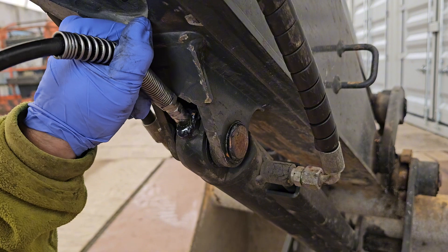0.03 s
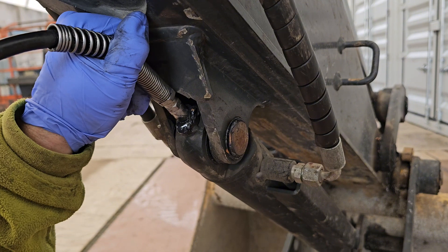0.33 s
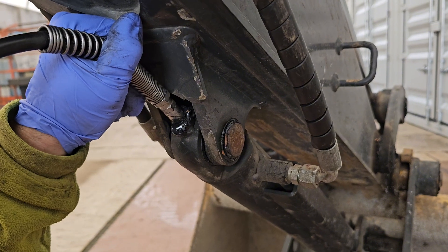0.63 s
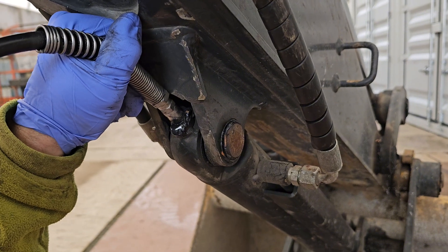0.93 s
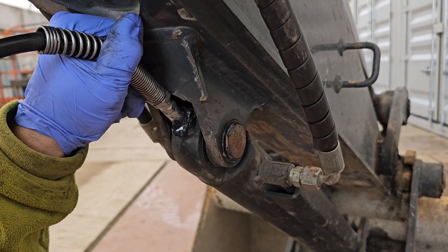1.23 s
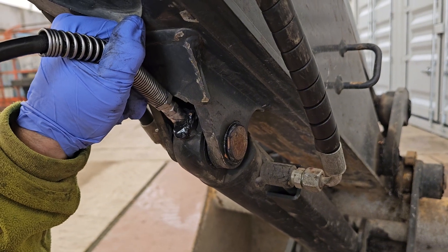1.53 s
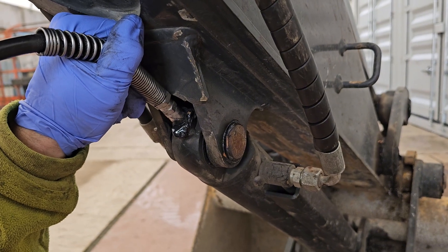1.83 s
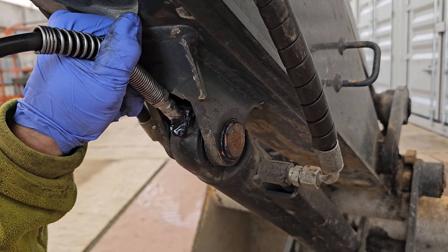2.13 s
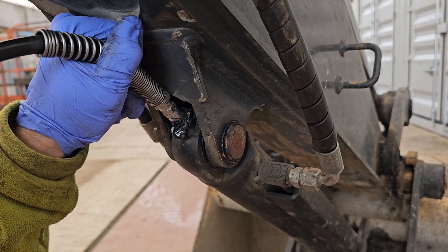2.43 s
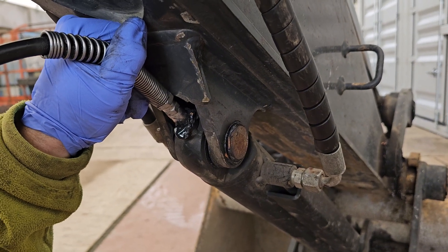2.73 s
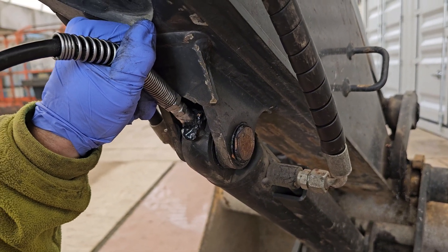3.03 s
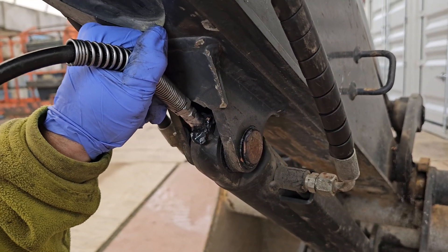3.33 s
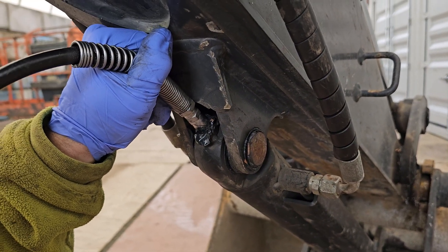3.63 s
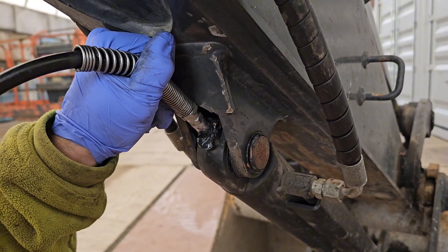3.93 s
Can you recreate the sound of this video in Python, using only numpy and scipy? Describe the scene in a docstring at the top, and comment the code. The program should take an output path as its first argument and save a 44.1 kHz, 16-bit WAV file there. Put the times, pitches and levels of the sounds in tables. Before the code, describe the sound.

A battery grease gun runs close by, outdoors over a faint distant engine hum. After a quiet opening, the trigger clicks at about 0.4 seconds and the motor whirs up. From 0.6 seconds it pumps evenly, six or seven strokes a second, each with a knock, a brief falling squeal and a bright metallic double snap. At about 3.9 seconds the motor stops quickly with a small click.

```python
"""Battery grease gun outdoors

The gun pumps into a fitting on a machine, close by, over a low hum. The trigger clicks and the geared
motor spins up. The plunger snaps free and rebounds in each stroke; from the second on, a clear knock
comes first and the push drags the motor down with a falling squeal. At last the motor brakes."""
import sys
import numpy as np
from scipy import signal
from scipy.fft import rfft, irfft
from scipy.io import wavfile
from scipy.ndimage import uniform_filter1d

SR = 44100
rng = np.random.default_rng(int(sys.argv[2]) if len(sys.argv) > 2 else 0)


def unload_wav(signal):
    """Save mono or channel-first audio to the path in sys.argv[1] as 16-bit WAV at rate SR, clipped to [-1, 1]."""
    wavfile.write(
        sys.argv[1],
        SR,
        np.round(np.clip(np.atleast_2d(signal).T, -1, 1) * 32767).astype(np.int16),
    )


N = 176400
TIME_S = np.arange(N) / SR
MOTOR_ON_S, MOTOR_OFF_S, FREE_SHAFT_HZ = .459, 3.868, 341.3


def amp(db):
    return 10 ** (np.asarray(db) / 20)


def unit_rms(x):
    return x / np.sqrt(np.mean(x ** 2) + 1e-20)


def lookup(table, hz, column=1):
    """One table column, interpolated over log frequency."""
    table = np.array(table, float)
    return np.interp(np.log(hz + 1), np.log(table[:, 0] + 1), table[:, column])


def add(mix, start_s, sound):
    part = mix[..., round(start_s * SR):][..., :sound.shape[-1]]
    part += sound[..., :part.shape[-1]]


def wander(hz):
    """Smooth random drift of unit RMS, rolling off above hz."""
    bins_hz = np.fft.rfftfreq(N, 1 / SR)
    return unit_rms(irfft(rfft(rng.standard_normal(N)) * np.exp(-(bins_hz / hz) ** 2), N))


def colour(x, spectrum):
    """Minimum-phase filter of unit energy."""
    size = 8192
    log_gain = np.log(amp(lookup(spectrum, abs(np.fft.fftfreq(size, 1 / SR)))))
    taps = np.fft.ifft(np.exp(np.conj(signal.hilbert(log_gain)))).real[:size // 2]
    return signal.oaconvolve(x, taps[None] / np.linalg.norm(taps), axes=1)[:, :N]


def whiten(burst, envelope):
    """Flattens a burst's spectrum; the envelope gates it and sets its RMS."""
    spectrum = rfft(burst)
    flat = irfft(spectrum / (abs(spectrum) + 1e-12), len(envelope))
    return unit_rms(flat * np.minimum(10 * envelope, 1)) * np.sqrt(np.mean(envelope ** 2))


def impacts(starts_s, levels_db, hold_s, fall_s, tail_db, tail_s, likeness, bounce_db, bounce_s):
    """Partly alike noise bursts: a contact, one quick bounce and a rattling tail."""
    t = np.arange(SR // 10) / SR
    contact = np.exp(-np.maximum(t - hold_s, 0) / fall_s)
    bounce = amp(bounce_db) * np.exp(-abs(t - bounce_s) / .0007)
    tail = amp(tail_db) * np.exp(-t / tail_s)
    envelope = np.minimum(t / .00028, 1) * np.sqrt(contact ** 2 + bounce ** 2 + tail ** 2)
    shared = rng.standard_normal((2, len(t)))
    out = np.zeros((2, N))
    for start_s, db in zip(starts_s, levels_db):
        grit = np.sqrt(likeness) * shared + np.sqrt(1 - likeness) * rng.standard_normal(shared.shape)
        add(out, start_s, amp(db) * whiten(envelope * np.tanh(grit), envelope))
    return out


def ring(starts_s, levels_db, modes, spread_db):
    """Decaying modes, struck a little differently each time."""
    t = np.arange(SR // 10) / SR
    hz, db, t60_s = np.transpose(modes)[:, :, None]
    waves = amp(db - 60 * t / t60_s) * np.exp(2j * np.pi * hz * t) * np.minimum(t / .00079, 1)
    out = np.zeros((2, N))
    for start_s, level_db in zip(starts_s, levels_db):
        gains = amp(level_db - spread_db * rng.standard_normal((2, len(modes))))
        phasors = np.exp(2j * np.pi * rng.random((2, len(modes))))
        add(out, start_s, ((gains * phasors) @ waves).real)
    return out


# Stereo balance. Each row: frequency in Hz, left minus right in dB.
BALANCE = [(200, 0.5), (500, 2.5), (1300, -1.5), (2500, -0.5), (4000, -1.5), (5000, 2), (6800, 3.5),
           (7900, 6.5), (8700, 10.5), (9600, 8), (10400, 3), (11400, -4.5), (12500, 5.5), (15000, -3)]
# Stereo likeness. Each row: frequency in Hz, coherence from 0 to 1, left lead in radians.
COHERENCE = [(100, 0.96, 0), (400, 0.91, 0.72), (1170, 0.9, -0.62), (1720, 0.4, 0.9), (2800, 0.34, 0.43),
             (3950, 0.51, 4.5), (5930, 0.074, -2.5), (8700, 0.27, 4.5)]


def stereo(pair):
    """Blends two signals into left and right, with balance, coherence and phase set by frequency."""
    hz = np.fft.rfftfreq(N, 1 / SR)
    left, other = rfft(pair)
    coherence = np.clip(lookup(COHERENCE, hz), 0, 1)
    lead_rad = lookup(COHERENCE, hz, column=2)
    right = coherence * left * np.exp(-1j * lead_rad) + np.sqrt(1 - coherence ** 2) * other
    lean = amp(lookup(BALANCE, hz) / 2)
    return irfft(np.array([left * lean, right / lean]), N)


# Outdoor air. Each row: frequency in Hz, relative level in dB.
AIR_SPECTRUM = [(20, -6.5), (40, -0.5), (60, 2.5), (105, -5.5), (140, -7), (200, -9), (300, -13),
                (500, -15), (800, -17.5), (1400, -18), (2100, -19), (3000, -22.5), (5000, -27),
                (8000, -34.5), (10000, -45), (11600, -29), (13000, -40), (15500, -43)]


def background(hum_hz=86.2, hum_db=-50, air_db=-44.5):
    """A distant engine's wavering hum, with rumbling air whose hiss settles before the motor starts."""
    phase = 2 * np.pi * np.cumsum(hum_hz + 2.57 * wander(hz=6.3)) / SR
    hum = amp(hum_db) * unit_rms(np.sin(phase) * (1 + .35 * wander(hz=7.3)))
    air_gain = amp(air_db + .77 * wander(hz=8.4))
    air = stereo(air_gain * colour(rng.standard_normal((2, N)), AIR_SPECTRUM))
    hiss = signal.sosfiltfilt(signal.butter(2, 400, "high", fs=SR, output="sos"), air)
    shelf_db = 2.8 - 7 * np.minimum(TIME_S / MOTOR_ON_S, 1)
    return hum + air + (amp(shelf_db) - 1) * hiss


# Softly ringing metal. Each row: frequency in Hz, level in dB, T60 in seconds.
FAINT_MODES = [(477, -48.5, .8), (1420, -57, 1.2), (2080, -54, 1.7), (2830, -56, 1.1)]


def faint_ring():
    """Metal already ringing at the start, dying away."""
    out = np.zeros((2, N))
    for hz, db, t60_s in FAINT_MODES:
        phase = 2 * np.pi * (hz * TIME_S + rng.random((2, 1)) / 4) + wander(hz=25)
        out += amp(db - 60 * TIME_S / t60_s) * np.sin(phase)
    return out


# Trigger and brake clicks. Each row: start in seconds, relative level in dB.
SWITCH_CLICKS = [(0.4324, -28), (.439, -40), (3.864, -33), (3.873, -34)]
# Colour of the clicks and the whirr. Each row: frequency in Hz, relative level in dB.
HOUSING_SPECTRUM = [(100, -19), (220, -14.5), (420, -22.5), (510, -10.5), (600, -16), (720, -7), (880, -13),
                    (1085, 0), (1190, -12.5), (1300, -0.5), (1450, -5.5), (1620, -1.5), (1820, -7),
                    (2100, -3), (2400, -3), (3000, -2), (3400, -3.5), (4600, -0.5), (5300, -7.5),
                    (6900, -8.5), (8000, -6), (8500, -14.5), (9700, -14), (10300, -21), (11600, -8.5),
                    (12400, -14.5), (14000, -14.5), (15500, -18.5)]


def switch():
    """Small plastic clicks as the gun starts and stops."""
    clicks = impacts(*np.transpose(SWITCH_CLICKS), hold_s=.0022, fall_s=.0039,
                     tail_db=-3.5, tail_s=.012, likeness=.15, bounce_db=-2, bounce_s=.004)
    return colour(clicks, HOUSING_SPECTRUM)


def windings(start_s=.447, length_s=.05, pulse_hz=1980, level_db=-44.5):
    """Pulsed drive current makes the windings sing until the shaft gets going."""
    envelope = np.sin(np.pi * np.clip((TIME_S - start_s) / length_s, 0, 1))
    phase = 2 * np.pi * pulse_hz * TIME_S
    return amp(level_db) * envelope * (np.sin(phase) + .5 * np.sin(2 * phase))


# Pump strokes. Each row: start in seconds and relative level in dB for knock, then snap, then rebound.
# The first stroke has no clear knock; its first two columns give only a faint tap.
PUMP_STROKES = [(0.5316, -10.5, 0.571, -10.5, 0.5809, -6.5), (0.6934, 0.5, 0.7293, -3, 0.7386, -3.5),
                (0.8426, 3.5, 0.8771, -0.5, 0.8875, -2.5), (0.9904, 3.5, 1.0252, -0.5, 1.0357, -3),
                (1.139, 2.5, 1.174, -2, 1.1872, -6), (1.2874, 2, 1.3239, -2.5, 1.3369, -6),
                (1.4392, 2, 1.4741, -2, 1.4878, -4.5), (1.5887, 1, 1.6254, -2, 1.6392, -4),
                (1.7404, 2, 1.7773, -3, 1.7918, -4.5), (1.893, 2, 1.9298, -2.5, 1.9435, -4.5),
                (2.0455, 1.5, 2.0826, -1, 2.0969, -4), (2.1984, 1.5, 2.2351, -0.5, 2.2495, -5.5),
                (2.3516, 1.5, 2.3886, -1.5, 2.4027, -4), (2.5051, 2, 2.542, -0.5, 2.5566, -5.5),
                (2.6588, -0.5, 2.6958, -1.5, 2.7109, -4), (2.8123, 0, 2.8504, -1.5, 2.8654, -4.5),
                (2.967, 1, 3.0049, -2, 3.0204, -5.5), (3.122, 1, 3.1601, -0.5, 3.1756, -5.5),
                (3.2778, 0, 3.3159, -2, 3.331, -5.5), (3.4335, 1, 3.4717, -4, 3.4872, -5.5),
                (3.5891, 1, 3.6277, -2.5, 3.6431, -6.5), (3.7455, 1, 3.7839, -1.5, 3.7997, -6.5)]


def motor(spin_up_s=.19, knee=6.5, wake_s=.038, brake_s=.026, sag_s=.011, recover_s=.03):
    """Soft start, drag from each push after the first, then braking. Running and load span 0 to 1."""
    drag, load = np.zeros((2, N))
    for knock_s, _, snap_s, *_ in PUMP_STROKES[1:]:
        push_s = snap_s - knock_s
        pushed_s = np.clip(TIME_S - knock_s, 0, push_s)
        freed_s = np.maximum(TIME_S - snap_s, 0)
        drag += (1 - np.exp(-pushed_s / sag_s)) * np.exp(-np.minimum(freed_s / recover_s, 20))
        load += np.sin(np.pi * (pushed_s / push_s) ** .72)
    elapsed_s = np.maximum(TIME_S - MOTOR_ON_S, 0)
    spin_up = elapsed_s / (elapsed_s ** knee + spin_up_s ** knee) ** (1 / knee)
    brake = np.exp(-np.maximum(TIME_S - MOTOR_OFF_S, 0) / brake_s)
    unloaded_hz = spin_up * brake * (FREE_SHAFT_HZ - 1.6 * TIME_S)
    sag = .18 + .009 * elapsed_s  # back pressure builds, so later pushes drag more
    shaft_hz = unloaded_hz * (1 - sag * drag) * (1 + .00399 * wander(hz=39.5))
    running = np.minimum(elapsed_s / wake_s, 1) ** 2 * brake
    return running, load, shaft_hz


def whirr(running, load, shaft_hz, ticks_per_s=900, base_db=-25, load_boost_db=3):
    """Gear teeth and brushes chatter once a turn and tick at random; a hiss lingers after the stop."""
    turns = np.cumsum(shaft_hz) / SR
    chatter = unit_rms(.88 + np.exp(-(turns % 1) / .39)) * rng.standard_normal((2, N))
    tick_gate = rng.random(N) < ticks_per_s / SR
    tick_db = 2.9 * np.minimum(rng.exponential(1, N), 4)
    ticks = tick_gate * amp(tick_db) * rng.standard_normal((2, N))
    level_db = base_db + load_boost_db * load + .75 * wander(hz=70) - .73 * (TIME_S - 2)
    gain = running * (shaft_hz / FREE_SHAFT_HZ) ** .74 * amp(level_db)
    stopped_s = np.maximum(TIME_S - MOTOR_OFF_S, 0)
    hiss = (stopped_s > 0) * amp(-35 - 35 * stopped_s) * rng.standard_normal((2, N))
    return colour(unit_rms(chatter + .34 * unit_rms(ticks)) * gain + hiss, HOUSING_SPECTRUM)


# Motor and gear tones at full speed. Each row: multiple of the shaft rate, free level in dB,
# loaded level in dB, left lead in radians.
SHAFT_ORDERS = [(1, -43.5, -50, 0.28), (3, -47.5, -57, .3), (4, -44, -61, 0.37), (5, -42, -56, 0.97),
                (12, -33.5, -46, 1.9)]
MESH_TEETH = 10


def whine(running, load, shaft_hz, start_gear_db=-32.5, start_gear_s=.115):
    """Rough shaft and gear tones that fade under load; one gear sings as the motor spins up."""
    turns = np.cumsum(shaft_hz) / SR
    tones = np.zeros((2, N))
    for order, free_db, loaded_db, lead_rad in SHAFT_ORDERS:
        jitter_rad = (.028 + .03 * load) * wander(hz=260) + .015 * wander(hz=60)
        phase = order * (2 * np.pi * turns + jitter_rad)
        gain = ((1 - load) * amp(free_db) + load * amp(loaded_db)) * (1 + .3 * wander(hz=140))
        tones += np.sqrt(2) * gain * np.array([np.sin(phase), np.sin(phase - lead_rad)])
    swell = np.sin(np.pi * np.clip((TIME_S - MOTOR_ON_S) / start_gear_s, 0, 1) ** 2) ** 2
    mesh_phase = 2 * np.pi * MESH_TEETH * turns + .3 * wander(hz=200)
    start_gear = amp(start_gear_db) * swell * np.sin(mesh_phase)
    return running * (tones * (shaft_hz / FREE_SHAFT_HZ) ** 2.2 + start_gear)


# Dull knock and bright snap. Each row: frequency in Hz, relative level in dB.
KNOCK_SPECTRUM = [(150, -23.5), (330, -5), (450, -3.5), (590, -9), (740, -3), (1000, 0), (1160, -8.5),
                  (1350, -1.5), (1600, 5), (1850, -5.5), (2100, 1), (2600, -4), (4000, -12), (7000, -24)]
SNAP_SPECTRUM = [(150, -36), (400, -28.5), (700, -17), (1000, -13), (1170, -20.5), (1320, -12.5),
                 (1800, -13), (2350, -5.5), (3000, -1.5), (3500, -8), (4250, 2.5), (4800, -7), (5700, -2),
                 (6600, -7.5), (7300, -4.5), (8000, -2.5), (8500, -12), (9400, -10), (10300, -19.5),
                 (11600, -6), (12500, -12.5), (14000, -16), (15500, -12.5)]
# Steel plunger and barrel, and housing. Each row: frequency in Hz, relative level in dB, T60 in seconds.
STEEL_MODES = [(2355, 1.5, .06), (2424, -6, .05), (2697, 2.5, 0.069), (2950, -13, 0.044), (3950, -0.5, .07),
               (4100, -0.5, 0.067), (4230, 2, 0.067), (4400, -4, .04), (4760, 1, 0.079), (5716, 6, 0.054),
               (7300, -14, .06), (7677, -3, 0.08), (7800, -9, 0.074), (7970, -2, 0.095), (8140, 0, 0.1)]
HOUSING_MODES = [(474, -9.5, 0.067), (733, -7, 0.038), (958, -10, 0.043), (1280, 1, 0.046),
                 (1605, -2, 0.04), (2110, -4, 0.048)]


def plunger():
    """Snap and rebound ring the steel; from stroke two, a clear knock on the grease rings the housing."""
    knock_s, knock_db, snap_s, snap_db, rebound_s, rebound_db = np.transpose(PUMP_STROKES)
    knocks = impacts(knock_s, knock_db - 20.5, hold_s=.0028, fall_s=.0016,
                     tail_db=-13.5, tail_s=.012, likeness=.797, bounce_db=-3.5, bounce_s=.0029)
    snaps = impacts(snap_s, snap_db - 7.7, hold_s=.0021, fall_s=.00075,
                    tail_db=-5, tail_s=.012, likeness=.72, bounce_db=-.5, bounce_s=.00447)
    rebounds = impacts(rebound_s, rebound_db - 8, hold_s=.0022, fall_s=.0026,
                       tail_db=-3, tail_s=.011, likeness=.3, bounce_db=-10.5, bounce_s=.015)
    steel = ring(snap_s, snap_db - 23, STEEL_MODES, spread_db=2)
    steel += ring(rebound_s, rebound_db - 25.5, STEEL_MODES, spread_db=2)
    housing = ring(knock_s, knock_db - 29, HOUSING_MODES, spread_db=.5)
    dull = colour(knocks + amp(-16) * rebounds, KNOCK_SPECTRUM)
    bright = colour(snaps + rebounds, SNAP_SPECTRUM)
    return dull + bright + steel + housing


# Loaded gear mesh. Each row: multiple of the mesh rate, relative level in dB, left lead in radians.
SQUEAL_HARMONICS = [(1, -25, 3.3), (2, -39, 3), (3, -46, 3), (4, -47, 3)]


def squeal(load, shaft_hz, barrel_hz=2750, half_width_hz=110, drift_rad_per_s=.55):
    """The loaded gear mesh squeals harshly, swelling as its falling pitch meets a barrel resonance."""
    mesh_hz = MESH_TEETH * shaft_hz
    mesh_phase = 2 * np.pi * np.cumsum(mesh_hz) / SR
    resonance = 1 + .7 / (1 + ((mesh_hz - barrel_hz) / half_width_hz) ** 2)
    out = np.zeros((2, N))
    for order, db, lead_rad in SQUEAL_HARMONICS:
        right_lag_rad = lead_rad - drift_rad_per_s * TIME_S  # drifts toward the centre
        for channel in range(2):
            phase = order * mesh_phase - channel * right_lag_rad + .5 * wander(hz=222)
            flutter = unit_rms(1 + .4 * wander(hz=450))
            out[channel] += np.sqrt(2) * amp(db) * flutter * np.sin(phase)
    return load * resonance * out


# Echo decay. Each row: frequency in Hz, T60 in seconds.
YARD_DECAY = [(200, 0.081), (2000, 0.2), (8000, 0.15), (15000, 0.061)]


def yard_echoes(x, echoes_per_s=2500, predelay_s=.005):
    """Sparse echoes off the machine and yard, each band dying at its own rate."""
    size = SR // 3
    taps = rng.standard_normal((2, size)) * (rng.random((2, size)) < echoes_per_s / SR)
    taps *= np.arange(size) > predelay_s * SR
    hz, t, bands = signal.stft(taps, SR, nperseg=256)
    tail = signal.istft(bands * amp(-60 * t / lookup(YARD_DECAY, hz)[:, None]), SR)[1]
    return signal.oaconvolve(x, tail / np.linalg.norm(tail, axis=1, keepdims=True), axes=1)[:, :N]


def scene():
    """The gun and its echoes over the outdoor background."""
    running, load, shaft_hz = motor()
    clatter = stereo(whirr(running, load, shaft_hz) + plunger() + switch())
    gun = clatter + whine(running, load, shaft_hz) + squeal(load, shaft_hz) + windings()
    return gun + amp(-12.5) * yard_echoes(gun) + background() + faint_ring()


def record(dry):
    """Full-scale ceiling, then a 15.9 kHz low-pass."""
    taps = signal.firwin(401, 15900, window=("kaiser", 8), fs=SR)
    return signal.oaconvolve(np.clip(dry, -1, 1), taps[None], "same")


dry = scene()
out = record(dry)
unload_wav(out)
```